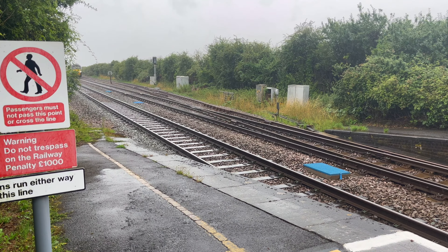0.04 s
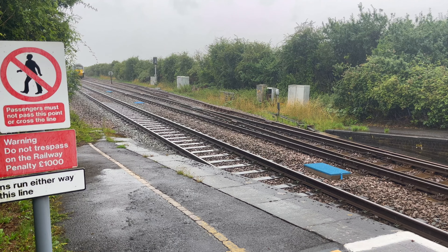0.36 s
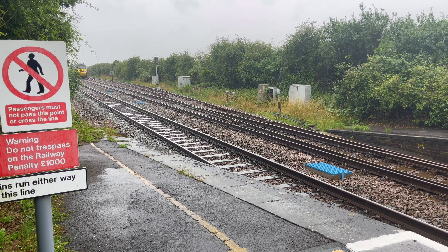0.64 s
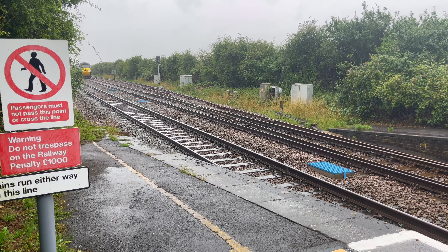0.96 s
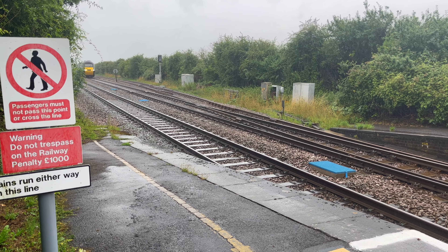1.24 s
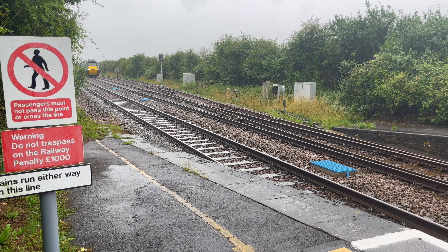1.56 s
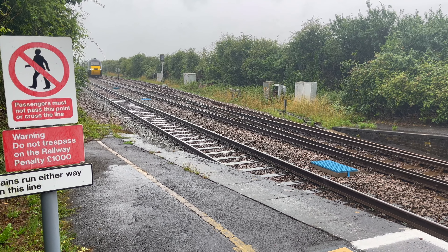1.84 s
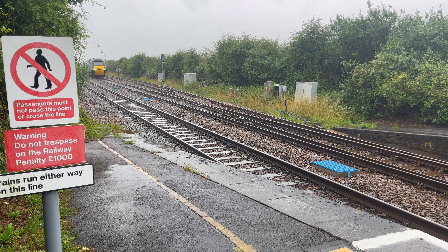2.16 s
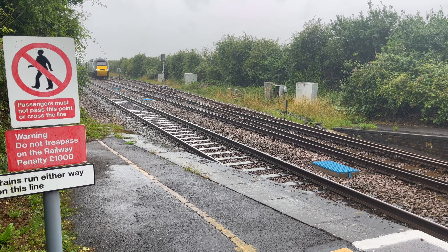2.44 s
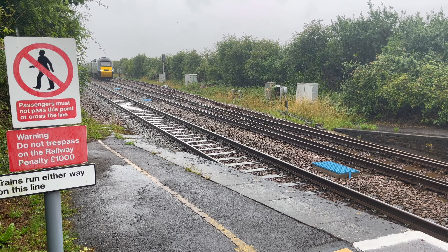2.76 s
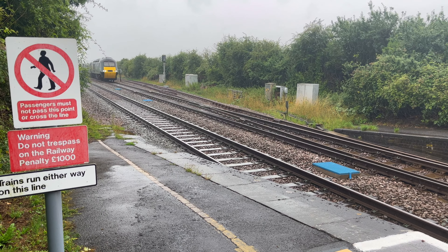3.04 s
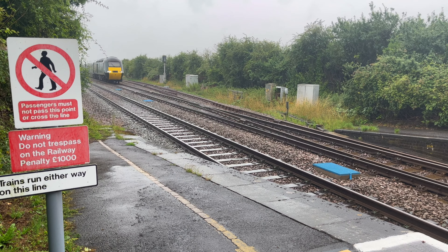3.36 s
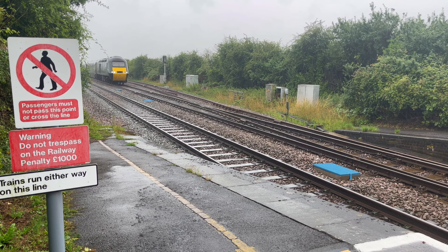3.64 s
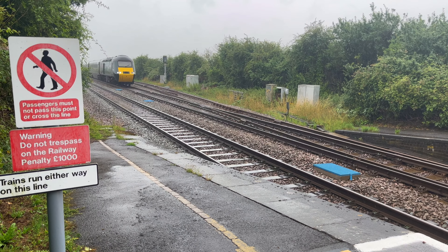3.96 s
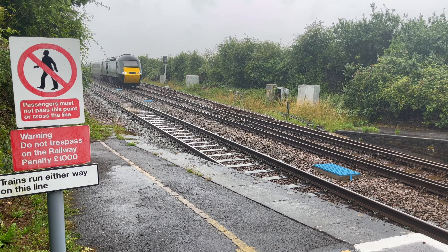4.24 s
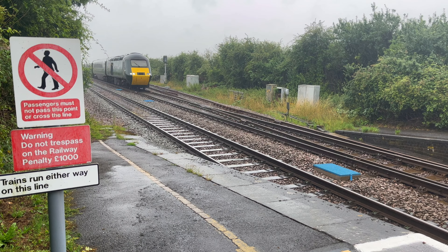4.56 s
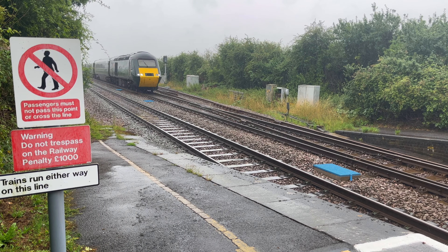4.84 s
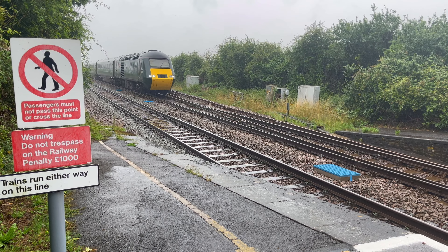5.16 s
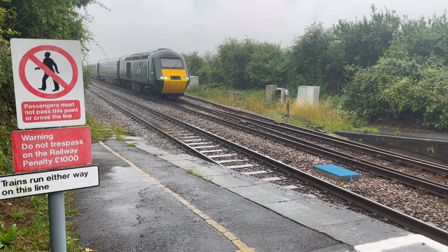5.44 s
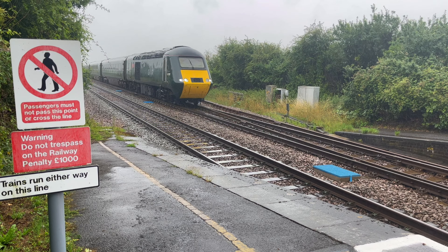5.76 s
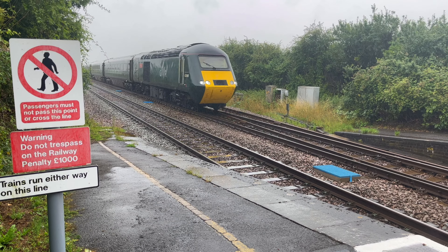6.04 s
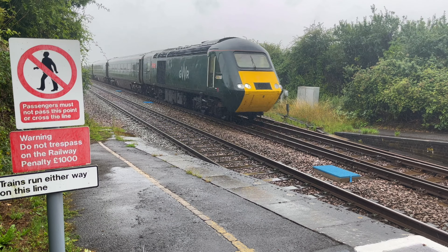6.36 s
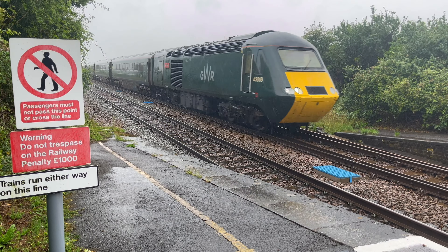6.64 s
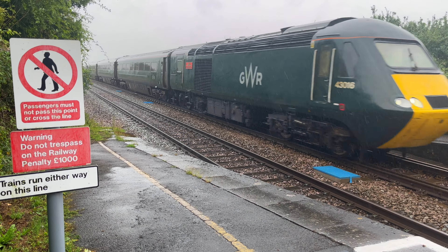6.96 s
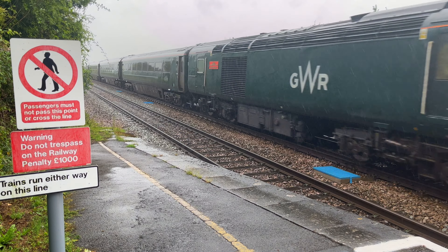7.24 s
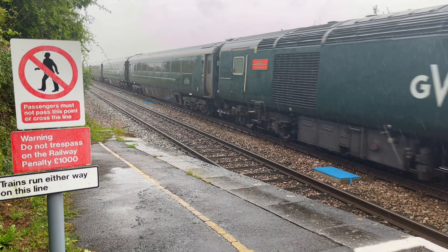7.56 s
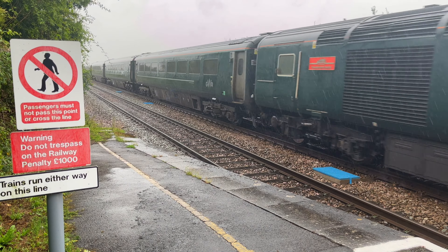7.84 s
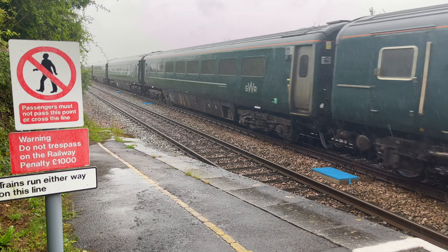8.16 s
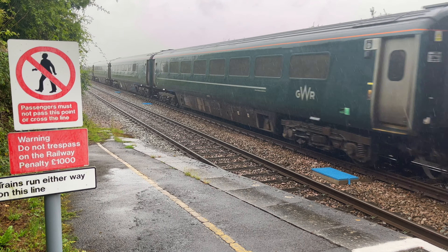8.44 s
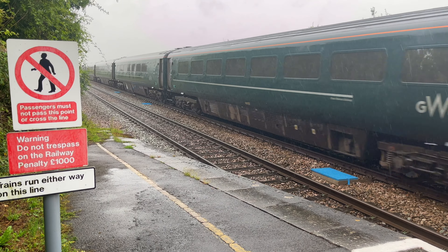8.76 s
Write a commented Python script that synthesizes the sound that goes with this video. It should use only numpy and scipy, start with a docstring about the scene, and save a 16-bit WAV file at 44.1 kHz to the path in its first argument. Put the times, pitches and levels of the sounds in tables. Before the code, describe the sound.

A diesel passenger train approaches and passes close by with a swelling engine drone, roaring wheels and clanking rail joints, in rustling wind.

```python
"""A diesel train passing in wet wind

A passenger train comes up from the left and runs past a platform. Each part swells as its distance
shrinks, and the Doppler effect lowers the exhaust's drone as it draws level. Rolling contact makes
wheels roar and rails hiss and ring; axles clank on impact with the joints. Wind rustles the hedges
and bumps the microphone, a few drops tick close by and a bird chirps faintly."""
import sys
import numpy as np
from scipy import signal
from scipy.fft import rfft, irfft, next_fast_len
from scipy.io import wavfile
from scipy.ndimage import uniform_filter1d, map_coordinates

SR = 44100
rng = np.random.default_rng(int(sys.argv[2]) if len(sys.argv) > 2 else 0)


def materialize(psi):
    """Save the field psi as 16-bit PCM at rate SR to the path in sys.argv[1].

    A 1-D psi becomes a single channel; in a 2-D psi each row is a channel.
    """
    bounded = np.clip(np.atleast_2d(psi).T, -1, 1)
    quanta = np.round(bounded * 32767).astype(np.int16)
    wavfile.write(sys.argv[1], SR, quanta)


N = 396459
SPEED_M_S, SOUND_M_S = 16.5, 343
SWING_S, SWING_HALF_S = 7.46, 0.18  # the train's sound swings from ahead to the right

# spectra of the body's rumble, wheels' roar and rails' hiss: (frequency [Hz], relative level [dB])
BODY_SPECTRUM = [(35, -14), (72, 3), (88, 5.5), (125, -8), (150, -9), (190, -5), (260, -5.5), (320, -7),
                 (400, -11.5), (600, -15), (1200, -72), (3000, -100)]
WHEEL_SPECTRUM = [(300, -4.5), (400, -6), (520, -2.5), (620, -2), (800, -4.5), (1000, -6), (1200, -5),
                  (1500, -8), (1900, -10), (2130, -7.5), (2330, -14), (2520, -30.5), (3200, -67)]
RAIL_SPECTRUM = [(1000, -70), (2100, -30), (2600, -8), (3500, -4.5), (4150, -2.5), (4600, 0.5), (5400, 3),
                 (6900, -3), (7900, -11.5), (9700, -12), (11200, -15.5), (13500, -19.5), (15500, -10.5)]
# the wheels' upper roar favours the left: (frequency [Hz], left minus right [dB])
WHEEL_BALANCE = [(900, -2), (1350, 4), (1600, 8), (2050, 6), (2600, 13)]
# a grinding band: (centre [Hz], width [Hz], relative level [dB])
GRIND_BAND = [(3250, 950, 0)]
# surges on rough rail and a lull between bogies: (time [s], half length [s], gain [dB])
SURGES = [(5.983, 0.07, 5), (6.45, .3, -0.5), (7.88, 0.12, 1)]
# stereo coherence of approaching sound, near sound and hiss: (frequency [Hz], correlation [-])
APPROACH_COHERENCE = [(100, 1), (300, 0.91), (480, 0.72), (690, 0.46), (870, -0.3), (1150, 0.67),
                      (1350, -0.31), (1570, -1.02), (2200, 0.7), (2700, 0.7)]
NEAR_COHERENCE = [(100, 0.9), (300, 0.84), (700, 0.47), (1150, 0.6), (1650, 0.83), (2050, 0.14),
                  (2600, 0.18)]
HISS_COHERENCE = [(450, 1), (1500, 0.22), (2500, -0.17), (4100, -0.027), (5000, -0.0083), (5800, -0.32),
                  (6700, 0.34), (8300, -0.44), (10000, 0.04), (11400, 1), (12700, 0.93), (15000, -0.97)]
def rolling(firing_phase):
    """Rolling noise of an extended source: first all of it lies ahead, then ever more to the right."""
    right = step(clock(), SWING_S, SWING_HALF_S)
    surge_db = sum(db * np.exp(-((clock() - s) / half_s) ** 2) for s, half_s, db in SURGES)

    def spread(spectrum):
        coming = noise(spectrum, APPROACH_COHERENCE, lead_ms=0.049)
        going = noise(spectrum, NEAR_COHERENCE, lead_ms=-0.26)
        return np.sqrt(1 - right) * coming + np.sqrt(right) * going
    jolts = wobble(12)  # uneven rail shakes body and wheels together
    throb = 1 + 0.15 * np.sin(firing_phase)  # each firing puffs the low roar
    body_db = passing(at_s=8, db=-23.5, breadth_m=28, ahead_db=11, behind_db=11)
    body = amp(body_db + 0.99 * surge_db + 0.16 * jolts) * throb * spread(BODY_SPECTRUM)
    roar = filtered(spread(WHEEL_SPECTRUM), lambda hz: panned(WHEEL_BALANCE, hz))
    wheel_db = passing(at_s=7.8, db=-18.6, breadth_m=12, ahead_db=9.3, behind_db=9.3)
    wheels = amp(wheel_db + surge_db + 0.041 * jolts) * roar
    rail_db = passing(at_s=8, db=-31.7, breadth_m=13, ahead_db=7, behind_db=4.5)
    rails = amp(rail_db + 0.5 * surge_db + 0.95 * wobble(25)) * noise(RAIL_SPECTRUM, HISS_COHERENCE)
    grind_db = passing(at_s=7.98, db=-35, breadth_m=21, ahead_db=23, behind_db=22)
    return body + wheels + rails + amp(grind_db) * band_noise(GRIND_BAND)


# the exhaust's roar through the muffler: (frequency [Hz], relative level [dB])
MUFFLER_SPECTRUM = [(80, -39), (155, 0.5), (195, -8.5), (240, -0.5), (305, -6.5), (420, -22), (800, -46),
                    (3000, -100)]
def exhaust(phase):
    """Periodic firing radiates a fundamental, a rougher octave and a puff of noise each cycle."""
    first_db = passing(at_s=7.5, db=-18.5, breadth_m=7.5, ahead_db=3.5, behind_db=4)
    first = amp(first_db + 0.84 * wobble(15)) * np.sin(phase + 0.23 * wobble(5.3))
    octave_db = passing(at_s=7.5, db=-24.5, breadth_m=32.5, ahead_db=14.5, behind_db=22)
    octave = amp(octave_db + 1.1 * wobble(15)) * np.sin(2 * phase + .5 * wobble(14))
    roar = noise(MUFFLER_SPECTRUM, coherence=[(250, 1.0)], lead_ms=0.091)
    puffs = unit((1 + 0.62 * np.sin(phase)) * roar)
    puff_db = passing(at_s=7, db=-30.5, breadth_m=15, ahead_db=15, behind_db=14)
    return np.sqrt(2) * (first + octave) + amp(puff_db + 4.6 * wobble(12)) * puffs


# envelope of the engine's growl: (time [s], level [dB])
GROWL_ENVELOPE = [(2.5, -67), (3.2, -45.5), (4.6, -49.5), (5.3, -40), (6.1, -30.5), (6.7, -33), (7.1, -36),
                  (7.85, -25.5), (9, -42)]
# its spectrum: (frequency [Hz], relative level [dB])
GROWL_SPECTRUM = [(130, -35), (180, 1.5), (245, -0.5), (310, 1), (375, 0), (430, -18), (800, -55)]
def growl(firing_phase):
    """Amplitude modulation: the firings chop the engine's throaty, unevenly heaving noise."""
    level_db = np.interp(clock(), *np.transpose(GROWL_ENVELOPE))
    chop = (1 + .8 * np.sin(firing_phase)) * amp(3 * wobble(18))
    return amp(level_db) * unit(chop * noise(GROWL_SPECTRUM, APPROACH_COHERENCE))


# axles striking joints, levels relative:
# (time [s], clank [dB], pitch [Hz], spectral breadth [-], clank T60 [s], thud [dB], ring [dB])
AXLE_IMPACTS = [(4.84, -28, 620, 1, .2, -36, -48), (4.908, -21, 640, .8, .18, -35, -26.5),
                (5.098, -26.5, 480, 1, .2, -27, -45), (5.907, -14.5, 680, .7, .15, -19, -38),
                (6.1, -17, 570, .9, .19, -20, -40), (6.345, -34, 500, 1, .15, -21, -42),
                (6.69, -22, 650, 1, .2, -22, -36), (6.867, -17, 950, 1, .1, -27, -36),
                (7.16, -18.5, 550, 1, .18, -31, -26), (7.84, -16, 650, 1.2, .18, -15, -23),
                (8.035, -10, 560, 1.2, .22, -16, -21), (8.275, -16, 500, 1, .25, -22, -31),
                (8.485, -10.5, 540, 1.2, .22, -16, -26), (8.722, -9.5, 680, 1.2, .32, -21, -19),
                (8.953, -13, 440, .8, .3, -22, -30)]
# the bogie's clank: (ratio to its pitch [-], relative level [dB])
CLANK_SPECTRUM = [(.25, -30), (.55, -6), (.8, -1.5), (1, 0), (1.25, -4), (1.55, -11), (2, -20), (4, -35),
                  (20, -55)]
# resonances of its steel: (centre [Hz], width [Hz], relative level [dB])
STEEL_BANDS = [(1200, 61, -9), (2090, 75, 2.5), (2300, 100, 1.5), (2860, 280, -6)]
# a low thud: (frequency [Hz], relative level [dB])
THUD_SPECTRUM = [(50, -17), (110, 12.5), (260, 24.5), (450, -5), (900, -54), (3000, -90)]
def joints(thud_t60_s=0.32, ring_t60_s=0.17):
    """Impact and damped decay: at a joint the bogie clanks and rings, then the sleepers thud."""
    out, t = np.zeros((2, N)), np.arange(SR // 4) / SR
    fast_rise, slow_rise = 1 - np.exp(-t / .002), 1 - np.exp(-t / .015)
    for s, clank_db, hz, breadth, t60, thud_db, ring_db in AXLE_IMPACTS:
        spectrum = [(hz * ratio ** breadth, db) for ratio, db in CLANK_SPECTRUM]
        lead_ms = left_lead_ms(s)
        clank = noise(spectrum, NEAR_COHERENCE, lead_ms, len(t)) * amp(clank_db - 60 * t / t60)
        thud = noise(THUD_SPECTRUM, NEAR_COHERENCE, lead_ms, len(t)) * amp(thud_db - 60 * t / thud_t60_s)
        ring = band_noise(STEEL_BANDS, len(t)) * amp(ring_db - 60 * t / ring_t60_s)
        add(out, s, fast_rise * (clank + ring) + slow_rise * thud)
    return amp(-4) * out


def gears():
    """Doppler-shifted tones of the drive: a rough hum and a whine nearly an octave up."""
    hum_db = passing(at_s=8.16, db=-24.5, breadth_m=5.5, ahead_db=10.5, behind_db=13)
    hum = amp(hum_db) * breathy_tone(hz=230, flutter_per_s=36, abreast_s=7.9, steady=1.5)
    whine_db = passing(at_s=8.12, db=-27.3, breadth_m=9, ahead_db=11, behind_db=11)
    whine = amp(whine_db) * breathy_tone(hz=451, flutter_per_s=44, abreast_s=7.6, steady=1.3)
    return hum + whine


def howl():
    """Narrow-band noise from the power car wavers and sinks with the Doppler shift."""
    level_db = passing(at_s=7.6, db=-32.7, breadth_m=10, ahead_db=10, behind_db=10)
    return amp(level_db + 2.5 * wobble(5)) * breathy_tone(hz=698, flutter_per_s=130, abreast_s=7)


# resonances of the rails: (centre [Hz], width [Hz], relative level [dB])
RAIL_BANDS = [(1805, 50, -26), (2225, 150, -2.5), (2960, 280, -6), (4550, 400, -9), (10500, 2500, -17.5)]
def rail_ring():
    """Resonance: the rails ring in a few bands ahead of the train."""
    level_db = passing(at_s=6.1, db=-43, breadth_m=24.5, ahead_db=11.5, behind_db=27)
    return amp(level_db + 2.1 * wobble(8.3)) * band_noise(RAIL_BANDS)


# hiss of the power car and of the coaches' wet wheels: (centre [Hz], width [Hz], relative level [dB])
POWER_CAR_BANDS = [(6680, 610, 6), (11700, 1800, -4)]
COACH_BANDS = [(5300, 330, -2.5), (9500, 3000, -0.5), (13200, 1900, -4)]
def hiss(bands, from_s, until_s, db, edge_s=0.075):
    """Randomly modulated band noise sizzles only while its vehicle is alongside."""
    alongside = step(clock(), from_s, edge_s) * (1 - step(clock(), until_s, edge_s))
    sizzle_db = 1.5 * wobble(250) + 2.6 * wobble(26)
    return amp(db + sizzle_db) * alongside * band_noise(bands)


# notes of rail or wheel: (peak time [s], half length [s], pitch [Hz], width [Hz], level [dB])
SUNG_NOTES = [(0.298, 1.3, 1436, 16, -58), (.8, .8, 1103, 24, -50.5), (3.2, 1.2, 1112, 40, -56),
              (6.1, 0.15, 12400, 1100, -58), (8.4, 0.03, 1635, 27, -31), (8.74, 0.15, 9650, 1200, -45),
              (8.13, .07, 5450, 260, -40), (8.28, .07, 5250, 260, -41), (8.76, .06, 5250, 300, -42),
              (8.95, .09, 5080, 320, -36.5)]
def singing():
    """Resonance in one narrow band: a rail or wheel sings or sizzles, swelling and fading."""
    out = np.zeros((2, N))
    for s, half_s, hz, width_hz, db in SUNG_NOTES:
        t = np.arange(max(0, s - 2 * half_s), min(N / SR, s + 2 * half_s), 1 / SR)
        swell = np.cos(np.pi / 4 * (t - s) / half_s) ** 2
        add(out, t[0], amp(db) * swell * band_noise([(hz, width_hz, 0)], len(t)))
    return out


# rustle of wet hedges: (frequency [Hz], relative level [dB])
HEDGE_SPECTRUM = [(30, -6.5), (75, 1.5), (140, -8.5), (280, -15.5), (520, -14.5), (740, -14), (1300, -18),
                  (2150, -18), (2650, -25), (5700, -27), (7000, -34.5), (7800, -40), (9800, -39.5),
                  (11300, -46.5), (15500, -45)]
# stereo coherence of distant sound: (frequency [Hz], correlation [-])
FAR_COHERENCE = [(80, 0.58), (300, 0.37), (700, 0.3), (1100, 0.34), (1600, 0.63), (2200, 0.045)]
def wind():
    """Broadband noise: wind rustles in the hedges, with a fine, high hiss on top."""
    leaves = noise(HEDGE_SPECTRUM, FAR_COHERENCE, lead_ms=0.35)
    fine_hiss = noise(HEDGE_SPECTRUM, HISS_COHERENCE)
    treble_share = lambda hz: np.clip((hz - 2000) / 1000, 0, 1)
    low = filtered(leaves, lambda hz: np.sqrt(1 - treble_share(hz)))
    high = filtered(fine_hiss, lambda hz: np.sqrt(treble_share(hz)))
    return amp(-35.5) * (low + high)


# eddies striking the microphone: (time [s], level [dB], pitch [Hz])
EDDIES = [(1.226, -13.5, 69.4), (1.42, -23, 91), (1.513, -22.5, 93), (5.75, -13.5, 78), (5.951, -11, 82.5),
          (6.528, -10.5, 80), (6.731, -13, 82), (6.93, -8, 81.5)]
def bumps(thud_db=-19, rise_s=0.009):
    """Pressure pulses: each eddy pushes the microphone for a cycle or two, with a soft thud."""
    out, t = np.zeros((2, N)), np.arange(SR // 8) / SR
    envelope = (t / rise_s) ** 2 * np.exp(2 * (1 - t / rise_s))
    for s, db, hz in EDDIES:
        thud = amp(thud_db) * noise(THUD_SPECTRUM, NEAR_COHERENCE, size=len(t))
        add(out, s, amp(db) * envelope * (thud - np.sin(2 * np.pi * hz * t)))
    return out


# the nearest drops: (time [s], level [dB], pitch [Hz], rise [cycles])
NEAR_DROPS = [(.437, -25, 3100, .4), (1.7697, -25, 1200, .35), (1.782, -35.5, 13000, .7),
              (1.95, -19.5, 1550, .3), (2.074, -38, 13000, .7), (2.795, -27, 1400, .4),
              (2.973, -32, 11500, .7), (3.341, -35, 12500, .7), (3.5, -35, 10800, .8),
              (4.938, -36, 11500, .7), (5.838, -23, 3300, .35), (6.437, -27, 11000, .7),
              (6.464, -18, 1900, .4), (6.72, -30, 10500, .7), (8.327, -20.5, 13000, .8)]
def drops(drizzle_count=45, drizzle_db=-43, drizzle_hz=11400):
    """Each impact is a damped oscillation of a few cycles; fine drizzle falls among the near drops."""
    out, t = np.zeros((2, N)), np.arange(SR // 100) / SR
    slots = np.arange(drizzle_count) + rng.random(drizzle_count)
    times = slots / drizzle_count * (N - len(t)) / SR
    drizzle = [(s, rng.normal(drizzle_db, 2.5), drizzle_hz, .8) for s in times]
    for s, db, hz, cycles in list(NEAR_DROPS) + drizzle:
        rise = hz * t / cycles
        balance = amp(rng.normal(0, 2) * np.array([[.5], [-.5]]))
        add(out, s, amp(db) * balance * rise * np.exp(1 - rise) * np.sin(2 * np.pi * hz * t))
    return out


# a small bird in the hedge: (time [s], pitch [Hz], level [dB])
BIRD_NOTES = [(4.98, 5200, -44), (5.008, 5250, -47), (5.145, 5150, -43), (5.17, 5300, -46),
              (5.235, 6140, -42)]
def bird():
    """Frequency modulation: each short whistle quavers and rises a little."""
    out, progress = np.zeros((2, N)), np.linspace(0, 1, SR // 32)
    for s, hz, db in BIRD_NOTES:
        quaver = np.interp(progress, np.linspace(0, 1, 24), rng.normal(0, .02, 24))
        phase = phase_of(hz * (1 + .03 * (progress - .5) + quaver))
        add(out, s, amp(db) * np.sin(np.pi * progress) * np.sin(phase))
    return out


def passing(at_s, db, breadth_m, ahead_db, behind_db):
    """Spreading loss: the level peaks at db and loses ahead_db or behind_db per doubling of distance."""
    gone_m = SPEED_M_S * (clock() - at_s)
    doublings = np.log2(np.hypot(gone_m / breadth_m, 1))
    return db - np.where(gone_m < 0, ahead_db, behind_db) * doublings


def doppler(abreast_s, miss_m=14):
    """Doppler factor of a source that passes miss_m away at abreast_s."""
    gone_m = SPEED_M_S * (clock() - abreast_s)
    return 1 / (1 + SPEED_M_S / SOUND_M_S * gone_m / np.hypot(gone_m, miss_m))


def left_lead_ms(s):
    """Arrival-time difference: the left port's lead turns to a lag as the train swings right."""
    return .05 - 0.48 * step(s, SWING_S, SWING_HALF_S)


def breathy_tone(hz, flutter_per_s, abreast_s, steady=0):
    """Random quadrature modulation widens a Doppler-shifted stereo tone of rms 1."""
    port_shift = np.pi * hz * left_lead_ms(clock()) / 1000 * np.array([[1], [-1]])
    phase = phase_of(hz * doppler(abreast_s)) + port_shift
    return unit((steady + wobble(flutter_per_s)) * np.sin(phase) + wobble(flutter_per_s) * np.cos(phase))


def noise(spectrum, coherence, lead_ms=0, size=N):
    """Partly coherent stereo noise of rms 1 that reaches the left port lead_ms early."""
    m = next_fast_len(size, True)
    hz = np.fft.rfftfreq(m, 1 / SR)
    angle = np.arccos(np.clip(along(coherence, hz), -1, 1)) / 2
    white = rng.standard_normal((2, 2 * len(hz))).view(complex)
    mid, side = white * amp(along(spectrum, hz)) * np.array([np.cos(angle), np.sin(angle)])
    delay = np.exp(-2j * np.pi * hz * lead_ms / 1000)
    return unit(irfft(np.array([mid + side, (mid - side) * delay]), m)[:, :size])


def band_noise(bands, size=N):
    """Stereo noise of rms 1 in Gaussian bands, each 9 dB down at one width from its centre."""
    hz = np.geomspace(500, 18000, 900)
    power = sum(amp(db - 9 * ((hz - centre) / width) ** 2) ** 2 / width for centre, width, db in bands)
    spectrum = np.column_stack([hz, 10 * np.log10(power + 1e-16)])
    return noise(spectrum, HISS_COHERENCE, size=size)


def scintillation(x, depth_db):
    """Moving air makes each patch of time and frequency swell and sink on its own."""
    patches = signal.stft(x, nperseg=512)[2]
    field = uniform_filter1d(rng.standard_normal(patches.shape[1:]), size=5, axis=0)
    field = uniform_filter1d(field, size=16, axis=1)
    return signal.istft(patches * unit(amp(depth_db * unit(field))))[1][:, :N]


def panned(balance, hz):
    """Constant-power gains for (frequency [Hz], left minus right [dB]) points."""
    gains = amp(along(balance, hz) * np.array([[.5], [-.5]]))
    return gains / np.sqrt(np.mean(gains ** 2, axis=0))


def filtered(x, response):
    """Linear filtering: the spectrum of x times a frequency response."""
    n = x.shape[-1]
    m = next_fast_len(n + 4096, True)
    return irfft(rfft(x, m) * response(np.fft.rfftfreq(m, 1 / SR)), m)[..., :n]


def wobble(rate):
    """A smooth random curve, rate knots a second."""
    knots = rng.standard_normal(int(N * rate / SR) + 4)
    coarse = np.arange(0, N, 32)
    return np.interp(np.arange(N), coarse, map_coordinates(knots, [coarse * rate / SR]))


def along(points, hz):
    """Interpolate (frequency [Hz], value) points on a log axis."""
    f, v = np.transpose(points)
    return np.interp(np.log(hz + 1), np.log(f + 1), v)


def step(t, middle_s, half_s):
    """A smooth rise from 0 to 1."""
    return .5 + .5 * np.tanh((t - middle_s) / half_s)


def phase_of(hz):
    """Phase is the integral of frequency."""
    return 2 * np.pi * np.cumsum(hz) / SR


def amp(db):
    """Decibels to gain."""
    return 10 ** (np.asarray(db) / 20)


def unit(x):
    """Scale to rms 1."""
    return x / np.sqrt(np.mean(x ** 2) + 1e-20)


def clock():
    """The time of every sample."""
    return np.arange(N) / SR


def add(track, s, sound):
    """Superpose a sound on the track at time s."""
    start = max(0, round(s * SR))
    track[:, start:start + sound.shape[-1]] += sound[..., :N - start]


def scene(firing_hz=50):
    """Superposition of train and weather; one firing phase drives exhaust, growl and rumble."""
    firing_phase = phase_of(firing_hz * doppler(abreast_s=7.95))
    drone = exhaust(firing_phase)
    roar = scintillation(rolling(firing_phase) + wind(), depth_db=0.8)
    power_car = drone + growl(firing_phase) + gears() + howl()
    ring = rail_ring()
    car_hiss = hiss(POWER_CAR_BANDS, from_s=7.27, until_s=7.95, db=-40)
    coach_hiss = hiss(COACH_BANDS, from_s=7.16, until_s=9.2, db=-46)
    track = ring + singing() + joints()
    return roar + power_car + car_hiss + coach_hiss + track + bumps() + drops() + bird()


# the microphone's two ports differ: (frequency [Hz], left minus right [dB])
PORT_BALANCE = [(60, 0.9), (280, 0.2), (470, 5), (680, 2.5), (920, 7), (1550, -2), (2080, 2.5),
                (2700, -0.5), (3600, 3.5), (5200, 6), (7500, 2), (9600, -1.5), (11000, 0)]
def record(dry, low_hz=33, top_hz=15720):
    """Band-limited microphone response: each port has its own colour; deep bass and top are cut."""
    def response(hz):
        low_cut = 1 - 1 / (1 + (hz / low_hz) ** 6)
        top_fade = np.interp(hz, [14200, top_hz], [1, .35])
        return panned(PORT_BALANCE, hz) * low_cut * top_fade * (hz < top_hz)
    return filtered(dry, response)


dry = scene()
out = record(dry)
materialize(out)
```